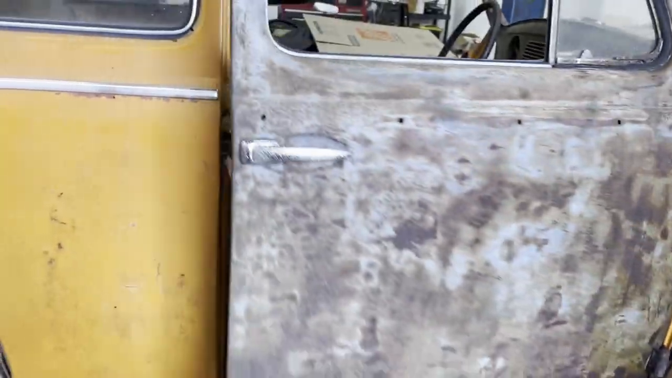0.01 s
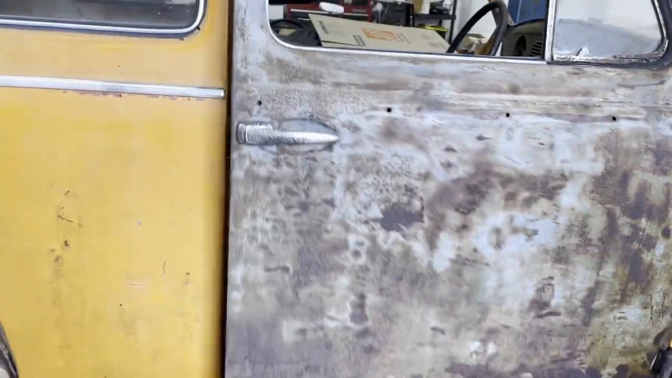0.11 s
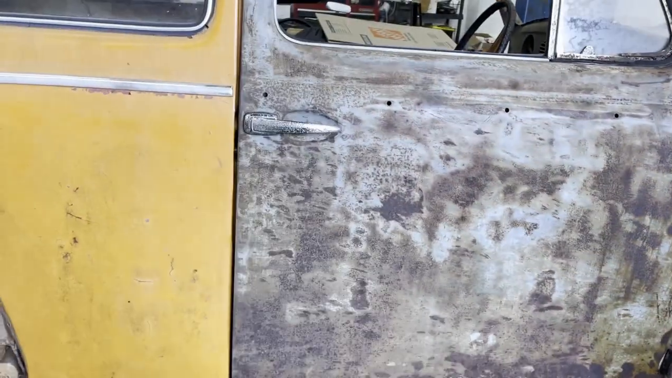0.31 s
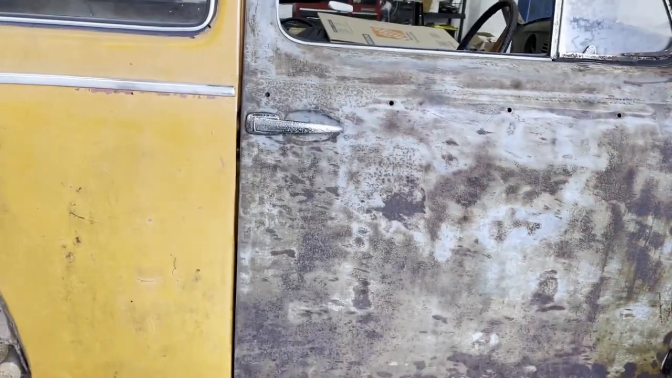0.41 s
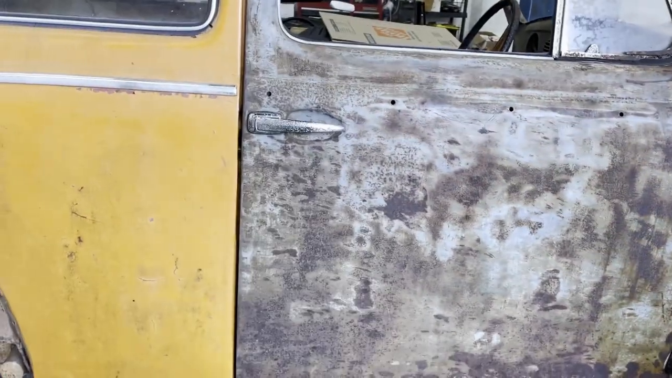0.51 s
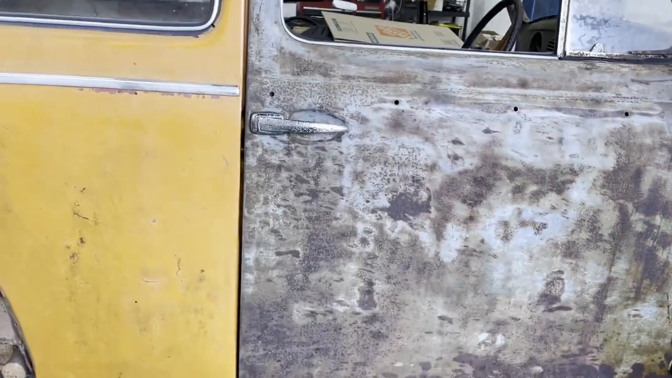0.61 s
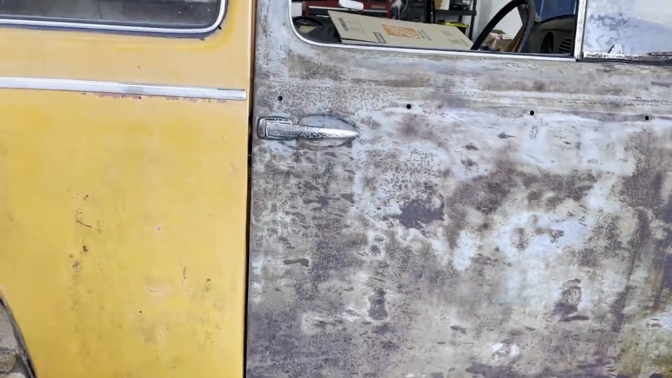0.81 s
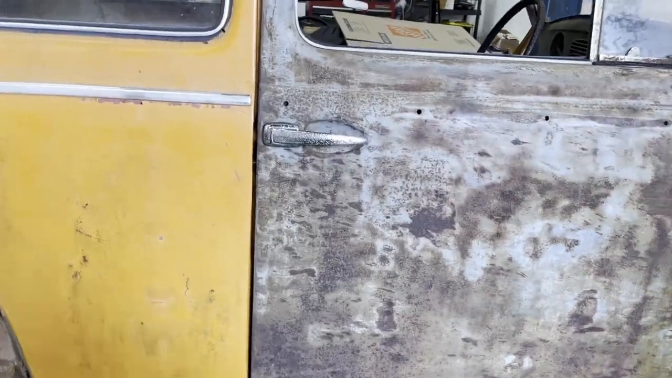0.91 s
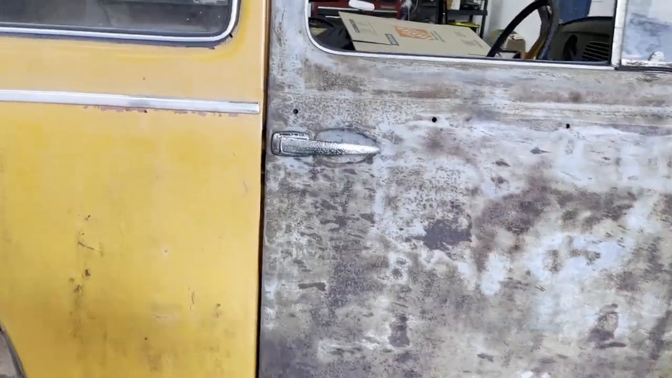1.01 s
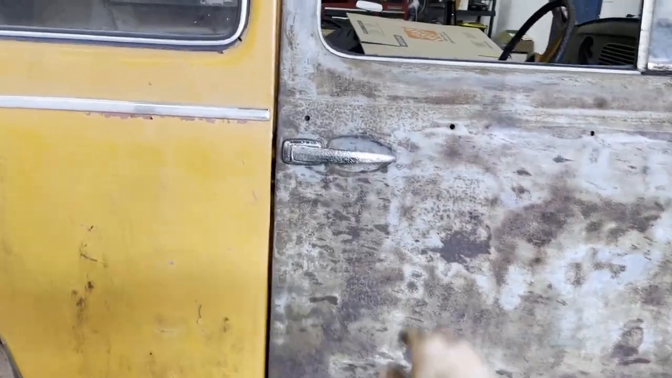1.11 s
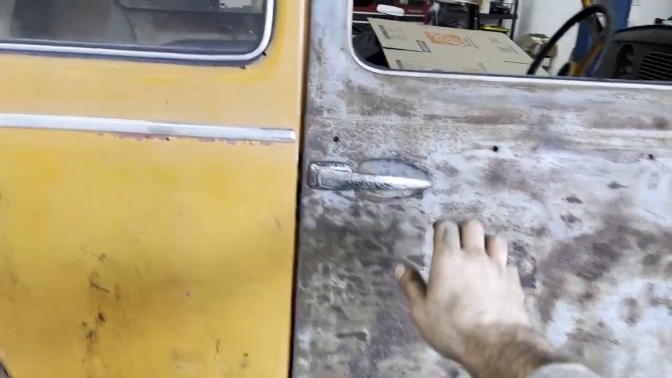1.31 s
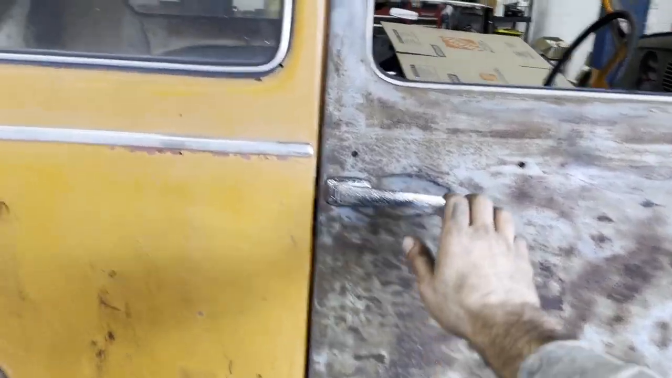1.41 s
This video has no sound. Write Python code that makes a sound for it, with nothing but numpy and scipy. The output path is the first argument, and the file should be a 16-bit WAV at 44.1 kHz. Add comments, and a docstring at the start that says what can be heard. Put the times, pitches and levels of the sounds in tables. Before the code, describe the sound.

Close phone pickup in a quiet, echoing garage: small latch clicks, one hard metallic car door slam with panel clank and brief rattle, a dying shudder, then soft cloth rustle and quick dull finger knocks by the handle.

```python
"""Car door slam in a garage

A heavy steel car door is slammed close to a handheld phone: latch ticks, rushing air, then noise cracks with
decaying sine modes for panels and body boom. The body shudders on; later fingers knock on the door skin by
the handle. Band-wise decaying noise gives the garage echo; shaped noise gives the sleeve's rustle and quiet room."""
import sys
import numpy as np
from scipy import signal
from scipy.fft import rfft, irfft, next_fast_len
from scipy.io import wavfile
from scipy.ndimage import uniform_filter1d

SR = 44100
rng = np.random.default_rng(int(sys.argv[2]) if len(sys.argv) > 2 else 0)


def wav_record(signal):
    """Record a signal, one row per channel, as 16-bit PCM in the file named by sys.argv[1]."""
    frames = np.transpose(np.atleast_2d(signal))
    bounded = np.clip(frames, -1, 1)
    # unit amplitude maps onto the largest positive 16-bit level
    quanta = np.round(bounded * 32767).astype(np.int16)
    wavfile.write(sys.argv[1], SR, quanta)


N = 66150
T = np.arange(N + SR // 10) / SR  # seconds, with 0.1 s to spare
SIZE = next_fast_len(2 * len(T))
HZ = np.maximum(np.arange(SIZE // 2 + 1) * SR / SIZE, 1)


def undb(db):
    """Decibels to amplitude."""
    return 10 ** (np.asarray(db) / 20)


def at(table, x, log=False):
    """Interpolate a two-column table; log for frequency."""
    a, b = np.array(table, float).T
    return np.interp(np.log(x), np.log(a), b) if log else np.interp(x, a, b)


def colour(x, table):
    """Filter by (hz, gain_db) points."""
    gain = undb(at(table, HZ, True))
    return irfft(rfft(x, SIZE) * gain, SIZE)[..., :len(T)]


def hiss(table):
    """Coloured noise, rms 1."""
    x = colour(rng.standard_normal(len(T)), table)
    return x / np.std(x)


def fall(start_s, decay_s, rise_s):
    """Quick rise, exponential fall; both times are time constants."""
    t = np.maximum(T - start_s, 0)
    return np.exp(-t / decay_s) * (1 - np.exp(-t / rise_s))


def convolve(x, h):
    """Linear convolution by FFT."""
    return irfft(rfft(x, SIZE) * rfft(h, SIZE), SIZE)[..., :len(T)]


def ring(modes, starts_s, level_db, lean_db_per_octave, push_s, scatter_db, detune=0):
    """Soft pushes excite decaying sine modes; mode levels and pitches scatter from push to push."""
    out = 0 * T
    hz, mode_db, t60_s = np.array(modes).T[:, :, None]
    octaves = np.log2(hz / np.median(hz))
    scatter = scatter_db * rng.standard_normal((len(starts_s), len(modes), 1))
    pitch = 1 + detune * rng.standard_normal(scatter.shape)
    leans = lean_db_per_octave + 0 * level_db
    for start, level, lean, offset_db, bend in zip(starts_s, level_db, leans, scatter, pitch):
        on = T > start
        t = T[on] - start
        envelope = undb(level + mode_db + lean * octaves + offset_db - 60 * t / t60_s)
        tones = envelope * np.sin(2 * np.pi * hz * bend * t)
        out[on] += tones.sum(axis=0) * (1 - np.exp(-t / push_s))
    return out


# door blows on the frame: start_s, crack_db, panel_db, boom_db, treble_db, decay_s
BLOW_TABLE = [(0.2248, -33, -17, -22.5, 9, 0.0037), (0.2286, -15.5, -20.5, -3, -8, 0.016),
              (0.235, -16, -3.5, -1.5, -16, 0.0022), (0.242, -10.5, 7, 11.5, 1.5, 0.006),
              (0.248, -14, -22, 4, -19.5, 0.0078), (0.254, -18, 1, 3, 4, 0.0056),
              (0.266, -16.5, -12.5, 7, -18, 0.012), (0.28, -18.5, -22, 3.5, -8, 0.008),
              (0.305, -15, -6.5, -6, -11.5, 0.0072)]
BLOW_S, BLOW_CRACK_DB, BLOW_PANEL_DB, BLOW_BOOM_DB, BLOW_TREBLE_DB, BLOW_DECAY_S = np.array(BLOW_TABLE).T
# crack noise spectrum: hz, gain_db
CRACK_TONE = [(100, -12), (300, -16), (600, -14), (1000, -11), (1760, -16.5), (5800, -21.5), (8100, -21),
              (10200, -21.5), (15000, -39)]
CRACK_RISE_S = 0.0012


def cracks():
    """Impact noise: one short coloured burst per blow, treble set blow by blow."""
    out = 0 * T
    for start, level, treble, decay in zip(BLOW_S, BLOW_CRACK_DB, BLOW_TREBLE_DB, BLOW_DECAY_S):
        noise = colour(hiss(CRACK_TONE), [(3000, 0.01), (9000, treble)])
        out += undb(level) * fall(start, decay, CRACK_RISE_S) * noise
    return out


# car body modes: hz, level_db, t60_s
BOOM_MODES = [(50.3, -4, 0.59), (67.4, -17.5, 0.15), (77, -2, 0.22), (87.95, 0.5, 0.42), (117, -1, 0.19),
              (170.6, -5, 0.23), (176, -18, 0.26), (252, -15, 0.13), (260, -10, 0.18), (300.3, -4, 0.28),
              (311.85, -12.5, .8), (332.7, -12, 0.16)]
# body shudders after the slam: start_s, level_db, lean_db_per_octave
SHUDDER_TABLE = [(0.345, -33, 14), (.40, -45.5, 7.5), (0.443, -32, 8.5), (0.464, -36.5, 9.5),
                 (.514, -30.5, 15), (0.618, -43.5, 5), (0.773, -38.5, -8)]
BOOM_DB, BOOM_PUSH_S, SHUDDER_PUSH_S = -19, 0.0093, 0.0078


def body_boom():
    """Low body modes, pushed by each blow, then by the later shudders."""
    boom = ring(BOOM_MODES, BLOW_S, BOOM_DB + BLOW_BOOM_DB, 0, BOOM_PUSH_S, scatter_db=1.5)
    shudders = ring(BOOM_MODES, *np.array(SHUDDER_TABLE).T, SHUDDER_PUSH_S, scatter_db=3.5, detune=.02)
    return boom + shudders


# door panel modes: hz, level_db, t60_s
PANEL_MODES = [(430.3, -15, 0.73), (598, -14.5, 0.29), (689.4, -3, 0.082), (738, 8, 0.041),
               (842, -1.5, 0.085), (882, -10.5, 0.14), (1024.8, -2, 0.096), (1382.6, -6.5, 0.16),
               (2495, -14, 0.17)]
PANEL_DB, PANEL_PUSH_S = -22.5, 0.00084
REBOUND_S, REBOUND_DB, REBOUND_PUSH_S = .52, -25, 0.038


def panels():
    """Panel modes ring at each blow, then softly as the door leans back on its seal."""
    struck = ring(PANEL_MODES, BLOW_S, PANEL_DB + BLOW_PANEL_DB, 0, PANEL_PUSH_S, scatter_db=2.5, detune=.025)
    rebound = ring(PANEL_MODES, [REBOUND_S], np.array([REBOUND_DB]), 0, REBOUND_PUSH_S, scatter_db=3)
    return struck + rebound


RATTLE_COUNT, RATTLE_DB, RATTLE_MEAN_DELAY_S = 40, -30.5, .035
RATTLE_FADE_DB_PER_S, RATTLE_LEAN_DB_PER_OCTAVE, RATTLE_PUSH_S = 90, 3.7, 0.00057
# small part: hz, level_db, t60_s
PING_MODES = [(6270, -19.5, 0.014)]
PING_S, PING_PUSH_S = .2835, 0.0011


def loose_parts():
    """Trim and rods chatter on the panel modes at random delays after the second blow; a small part pings."""
    delay_s = RATTLE_MEAN_DELAY_S * rng.exponential(size=RATTLE_COUNT)
    level_db = RATTLE_DB - RATTLE_FADE_DB_PER_S * delay_s
    rattle = ring(PANEL_MODES, BLOW_S[1] + delay_s, level_db, RATTLE_LEAN_DB_PER_OCTAVE, RATTLE_PUSH_S,
                  scatter_db=4, detune=.04)
    ping = ring(PING_MODES, [PING_S], np.zeros(1), 0, PING_PUSH_S, scatter_db=4)
    return rattle + ping


# latch noise spectrum: hz, gain_db
LATCH_TONE = [(200, -21), (300, -9.5), (800, -20), (1300, -3), (2500, -17.5), (5400, -28.5), (7000, -36.5),
              (8500, -66)]
# latch modes: hz, level_db, t60_s
LATCH_MODES = [(1060, -4, .06), (1270, 0, .06), (1440, -1, .06)]
# latch ticks: start_s, level_db, lean_db_per_octave
LATCH_TICK_TABLE = [(0.152, -39.5, 9.5), (0.166, -43, -1), (0.178, -40, -21)]
LATCH_S, LATCH_DB, LATCH_DECAY_S, LATCH_RISE_S = .1505, -41, 0.06, .0015
LATCH_PUSH_S = 0.001674


def latch():
    """Noise burst plus three short metallic ticks before the blows."""
    noise = undb(LATCH_DB) * fall(LATCH_S, LATCH_DECAY_S, LATCH_RISE_S) * hiss(LATCH_TONE)
    return noise + ring(LATCH_MODES, *np.array(LATCH_TICK_TABLE).T, LATCH_PUSH_S, scatter_db=2.5)


# air pushed by the closing door: time_s, level_db
SWING_LEVEL = [(.06, -80.5), (.13, -74.5), (.19, -58), (.225, -60)]
SWING_HZ = 252


def air_rush():
    """Low-mid noise swells as the door closes, cut at the second blow."""
    tone = [(SWING_HZ / 4, -6), (SWING_HZ, 0), (SWING_HZ * 3, -20), (9000, -60)]
    return undb(at(SWING_LEVEL, T)) * (T < BLOW_S[1]) * hiss(tone)


# finger knocks: start_s, skin_db, skin_lean_db_per_octave, thump_db, thump_lean_db_per_octave,
# tick_db, tick_lean_db_per_octave
KNOCK_TABLE = [(1.127, -42.5, 34, -41, -10.5, -72, -1.5), (1.144, -37, -3, -32, 4.5, -39.5, -1.5),
               (1.198, -38, 22, -66.5, 1, -58.5, -23), (1.227, -37.5, -17, -27.5, -11, -45.5, 1),
               (1.265, -31, 12.5, -26, -5.5, -46, -6), (1.291, -42.5, 19, -54, 8.5, -50.5, -7),
               (1.319, -47.5, 19, -27, 11, -66, -7), (1.358, -33, -10.5, -38, 9, -44.5, -4),
               (1.397, -44.5, -6, -34, 17, -55, -9), (1.419, -38.5, 11, -48.5, -3, -64, -9),
               (1.44, -38.5, -3, -49, 6, -61.5, -16.5), (1.47, -42, 7, -41, -1, -58.5, -7)]
# door skin modes: hz, level_db, t60_s
SKIN_MODES = [(411.2, -17, 0.071), (467.5, -1.5, 0.089), (507, -2.5, 0.081), (527, 0.5, 0.069),
              (565, -7.5, 0.085), (636.6, 1.5, 0.075), (692, -11, 0.05)]
# low thump modes: hz, level_db, t60_s
THUMP_MODES = [(67, -5, 0.15), (100.6, -5.5, 0.34), (117.5, -5.5, 0.045), (155.3, -11.5, 0.25)]
# handle modes: hz, level_db, t60_s
TICK_MODES = [(1337, 3, 0.027), (1975, -1.5, 0.022), (2390, -2, 0.023), (3100, -7, 0.022)]
# noise spectrum of rubbing skin and sleeve: hz, gain_db
RUSTLE_SPECTRUM = [(1000, 5), (1800, -9.5), (2400, -1), (4500, -22.5), (7000, -22.5), (8000, -25.5),
                   (12000, -32.5)]
RUB_UNDER_TICK_DB, RUB_DECAY_S, RUB_RISE_S = 7, .01, 0.0018
SKIN_PUSH_S, THUMP_PUSH_S, TICK_PUSH_S = 0.0022, 0.0065, 0.0016


def fingers():
    """Knocks push skin, thump and handle modes; finger skin rubs as short noise bursts."""
    start_s, skin_db, skin_lean, thump_db, thump_lean, tick_db, tick_lean = np.array(KNOCK_TABLE).T
    rub_level = sum(undb(db - RUB_UNDER_TICK_DB) * fall(start, RUB_DECAY_S, RUB_RISE_S)
                    for start, db in zip(start_s, tick_db))
    rub = rub_level * hiss(RUSTLE_SPECTRUM)
    tick = ring(TICK_MODES, start_s, tick_db, tick_lean, TICK_PUSH_S, scatter_db=1.5, detune=0.017)
    skin = ring(SKIN_MODES, start_s, skin_db, skin_lean, SKIN_PUSH_S, scatter_db=0, detune=0.019)
    thump = ring(THUMP_MODES, start_s, thump_db, thump_lean, THUMP_PUSH_S, scatter_db=2.1)
    return rub + tick + skin + thump


# sleeve level: time_s, level_db
RUSTLE_LEVEL = [(.85, -79), (.95, -57), (1.05, -51.5), (1.12, -53), (1.3, -53), (1.5, -60.5)]
FLICKER_WINDOW_HZ, FLICKER_RMS_DB = 40, 2.5  # averaging window is 1 / FLICKER_WINDOW_HZ


def rustle():
    """Cloth and skin scrape in patches: noise with a smoothed random level."""
    flicker = uniform_filter1d(rng.standard_normal(len(T)), int(SR / FLICKER_WINDOW_HZ))
    level_db = at(RUSTLE_LEVEL, T) + FLICKER_RMS_DB * flicker / np.std(flicker)
    return undb(level_db) * hiss(RUSTLE_SPECTRUM)


# garage decay: hz, t60_s
GARAGE_DECAY = [(50, 1.9), (200, 1.58), (500, 1.87), (1000, 1.285), (2500, 1.07), (5500, 0.88),
                (8000, 0.61), (12000, 0.46)]
# garage echo spectrum: hz, gain_db
GARAGE_SPECTRUM = [(50, 8.5), (150, 5.5), (400, 0), (1000, -2), (3000, 1), (6000, 1.5), (12000, 0)]
BUILD_S = 0.0013


def garage():
    """Echo pattern: noise in half-octave bands, each dying at its own rate."""
    noise = rfft(rng.standard_normal(len(T)), SIZE)
    out = 0 * T
    for hz in 31 * 2 ** np.arange(0, 9.1, .5):
        band = np.maximum(1 - np.abs(2 * np.log2(HZ / hz)), 0)
        level_db = at(GARAGE_SPECTRUM, hz, True) - 60 * T / at(GARAGE_DECAY, hz, True)
        out += irfft(noise * band, SIZE)[:len(T)] * undb(level_db)
    return out * (1 - np.exp(-T / BUILD_S)) / np.sqrt(SR / 10)


# room noise spectrum: hz, gain_db
ROOM_SPECTRUM = [(18, -32), (30, 10.5), (142, 10.5), (184, -9), (228, -2), (395, -0.5), (2600, -15.5),
                 (2860, -22), (5320, -20.5), (9000, -44), (11700, -71)]
ROOM_DB = -55.5


def room():
    """Quiet room: steady coloured noise."""
    return undb(ROOM_DB) * hiss(ROOM_SPECTRUM)


# sends to the walls, of cracks and air, of ringing parts, of knocks: hz, gain_db
NOISE_TO_WALLS = [(60, 13.5), (300, 13.5), (700, -1)]
BODY_TO_WALLS = [(60, -38.5), (250, -14), (700, -10)]
HAND_TO_WALLS = [(150, -4), (400, -1), (900, 0.5), (1500, -7.5)]
# side signal filters, of near sound and of the room: hz, gain_db
NEAR_SIDE = [(60, -34), (110, -23), (200, -22), (370, -26), (690, -14.5), (1260, -6.5), (2320, -2),
             (4270, -1), (7850, 2.5), (14400, 1)]
ROOM_SIDE = [(60, -19.5), (110, -15), (200, -12.5), (370, -11), (690, -2.5), (1260, 0.5), (2320, -0.5),
             (4270, -4), (7850, 3), (14400, -3.5)]
# microphone response, of mid and of side: hz, gain_db
MIC_MID_RESPONSE = [(20, -24), (40, -9.5), (60, 0.5), (7000, 2), (7700, -7), (8300, -24.5), (8800, -4.5),
                    (10000, 2), (13500, 3.5), (15000, -21)]
MIC_SIDE_RESPONSE = [(9500, 0), (11000, -5.5), (12500, -14), (14500, 16.5)]
# channel balance: hz, left_over_right_db
BALANCE = [(100, 0.5), (500, -0.5), (2300, 2.5), (4300, 4.5), (8000, -0.5)]


def scene():
    """Near sound, echoes, rustle and room mixed as mid and side, then turned into left and right."""
    noisy = cracks() + air_rush()
    body = panels() + body_boom() + loose_parts() + latch()
    hand = fingers()
    near = noisy + body + hand
    send = colour(noisy, NOISE_TO_WALLS) + colour(body, BODY_TO_WALLS) + colour(hand, HAND_TO_WALLS)
    # independent draws for mid and side
    far_mid, far_side = [convolve(send, garage()) + room() + rustle() for _ in range(2)]
    mid = colour(near + far_mid, MIC_MID_RESPONSE)
    near_shifted = np.imag(signal.hilbert(near))  # 90 degrees
    side = colour(colour(near_shifted, NEAR_SIDE) + colour(far_side, ROOM_SIDE), MIC_SIDE_RESPONSE)
    half_balance = np.array(BALANCE) * [1, .5]
    left = colour(mid + side, half_balance)
    right = colour(mid - side, half_balance * [1, -1])
    return np.array([left, right])[:, :N]


LIMIT, TOP_HZ = 1.2, 14900  # amplitude ceiling, low-pass edge


def record(dry):
    """The phone rounds the highest peaks and cuts the top."""
    rounded = LIMIT * np.tanh(dry / LIMIT)
    low_pass = signal.ellip(8, .2, 70, TOP_HZ, fs=SR, output="sos")
    return signal.sosfilt(low_pass, rounded)


dry = scene()
out = record(dry)
wav_record(out)
```